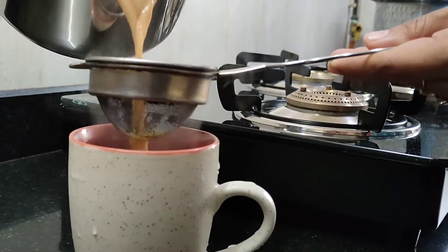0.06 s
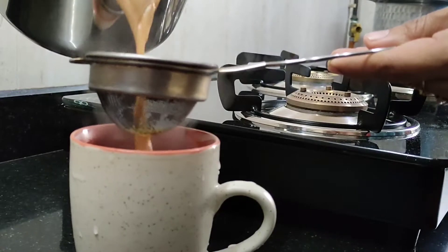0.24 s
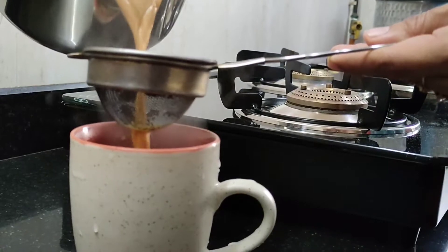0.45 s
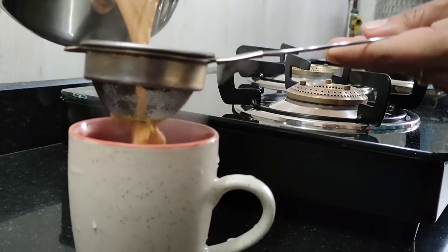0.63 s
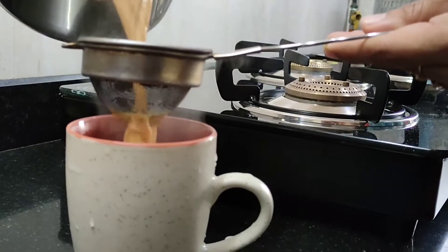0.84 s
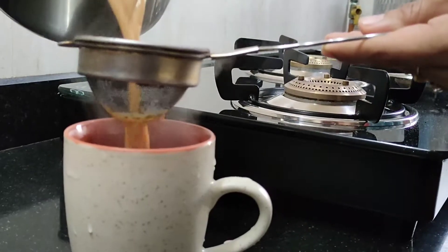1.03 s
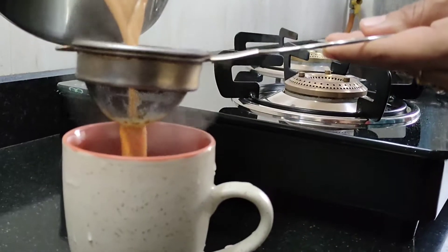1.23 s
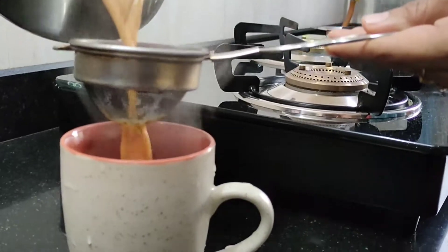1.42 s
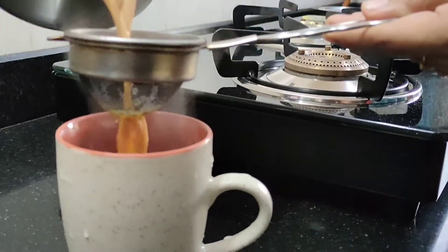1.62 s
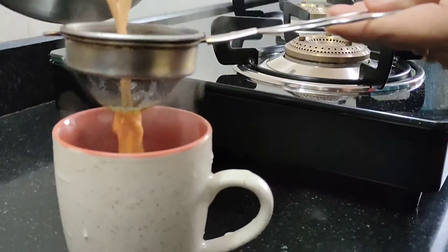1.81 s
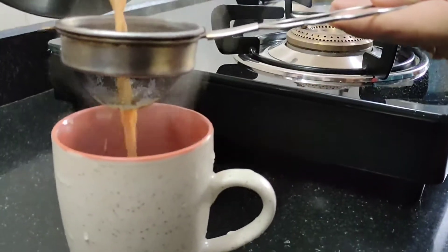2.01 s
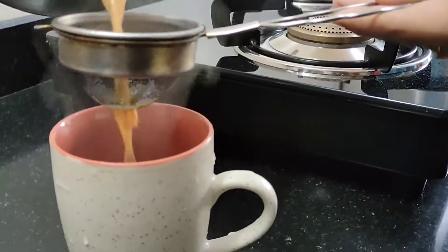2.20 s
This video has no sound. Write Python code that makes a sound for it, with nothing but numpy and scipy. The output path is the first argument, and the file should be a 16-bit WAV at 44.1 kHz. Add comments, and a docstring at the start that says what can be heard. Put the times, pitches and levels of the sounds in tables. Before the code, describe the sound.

Hot tea pours through a strainer into a ceramic mug, heard close up in a small kitchen. Bubbles plop and spray patters, then the stream thins and its note climbs, over a low rumble and faint appliance hum.

```python
"""Hot tea pours from a pan through a strainer into a ceramic mug, heard close up in a small kitchen.
The stream traps air bubbles that plop and make the air in the mug ring; spray snaps and patters
around them. As the mug fills, the flow thins, the bubbles get smaller and the note of the mug climbs.
Underneath, a low rumble swells and fades with the pour, and an appliance hums."""
import sys
import numpy as np
from scipy import signal
from scipy.fft import rfft, irfft
from scipy.io import wavfile
from scipy.ndimage import uniform_filter1d

SR = 44100
rng = np.random.default_rng(int(sys.argv[2]) if len(sys.argv) > 2 else 0)


def to_wav(s):
    """Save 16-bit WAV."""
    ch = np.atleast_2d(s).T  # columns
    pcm = np.round(np.clip(ch, -1, 1) * 32767)  # PCM
    wavfile.write(sys.argv[1], SR, pcm.astype(np.int16))


N = 103635

# colour of the low background rumble: frequency_hz, density_db
RUMBLE_COLOUR = [(15, 5), (40, 9.5), (160, 5.5), (260, 1.5), (600, -5.5), (1500, -37), (16000, -64)]
# low background rumble that swells with the pour and fades as it thins: time_s, level_db
RUMBLE_LEVEL = [(.2, -54), (1.15, -49), (2.2, -57)]
# partials of the appliance hum: pitch_hz, level_db
HUM_PARTIALS = [(120.2, -52), (227, -62.5)]
# reverb time of the kitchen: frequency_hz, t60_s
KITCHEN_DECAY = [(150, 0.4), (1000, 0.033), (5000, 0.051), (15000, 0.026)]
# two low notes of the air in the mug and the thin ring of the strainer: pitch_hz, t60_s, gain_db
MUG_MODES = [(570, 0.032, 10), (695, 0.019, 4), (8200, 0.024, -20)]
# rising note of the air column, around which the small bubbles sound: time_s, pitch_hz
COLUMN_NOTE = [(.3, 1095), (.7, 1310), (1.1, 1370), (1.5, 1535), (1.85, 1840)]
# colour of the spray: frequency_hz, gain_db
SPRAY_COLOUR = [(300, -40), (1200, 1), (2800, -3.5), (4700, -1), (6500, -12), (7900, 0.5), (9500, -0.5),
                (11000, -5), (12300, -1), (16000, -13)]
# loud drops of spray bursting: start_s, level_db, centre_hz
SPRAY_DROPS = [(0.241, -22.5, 12100), (0.2995, -15, 9360), (0.3683, -22, 5530), (0.4672, -16.5, 9160),
               (0.501, -22, 4450), (0.54, -29, 3470), (0.5671, -19.5, 8860), (0.5992, -14.5, 9370),
               (0.6063, -18, 7660), (0.7059, -21, 9800), (0.73, -23.5, 4170), (0.817, -21.5, 8500),
               (0.859, -21, 8600), (0.8842, -20.5, 9030), (0.909, -19.5, 7700), (0.919, -22, 4300),
               (0.943, -22.5, 8200), (0.9783, -28, 8200), (1.009, -20, 6330), (1.012, -16.5, 8320),
               (1.039, -24.5, 14700), (1.0687, -23, 3580), (1.076, -10.5, 10570), (1.1064, -23.5, 3860),
               (1.1106, -23.5, 8500), (1.131, -26.5, 7200), (1.154, -20, 8260), (1.158, -18.5, 13500),
               (1.181, -23, 4320), (1.235, -20.5, 6800), (1.3383, -30, 3920), (1.391, -28.5, 8060),
               (1.4406, -18.5, 4520), (1.4856, -14.5, 11700), (1.5325, -16.5, 7200), (1.5946, -20.5, 7060),
               (1.5989, -16, 9300), (1.664, -22, 8840), (1.6704, -22.5, 8900), (1.827, -28.5, 4800),
               (1.988, -31.5, 11800), (2.0215, -25.5, 7800), (2.0447, -29, 7460), (2.1382, -21, 12600),
               (2.292, -32, 3780)]
# strength of the stream: time_s, burble_db, patter_db
STREAM_FLOW = [(.14, -39.5, -42), (.21, -42.5, -35.5), (.29, -49, -46), (.42, -35, -39.5),
               (.58, -37.5, -38.5), (.72, -40, -43), (.9, -36.5, -41), (.98, -43, -45.5),
               (1.17, -42, -41.5), (1.36, -49.5, -55), (1.5, -47.5, -40.5), (1.72, -48.5, -47.5),
               (1.86, -42, -39.5), (2.0, -53, -52), (2.08, -49, -49.5), (2.18, -53, -53), (2.35, -59, -52)]
# single bubbles trapped by the stream: start_s, level_db, pitch_hz, decay_cycles
TRAPPED_BUBBLES = [(0.207, -14.5, 1260, 0.77), (0.24, -6.5, 1134, 4.5), (0.2518, -29, 1200, 5.6),
                   (0.2984, -5.5, 970, 2.3), (0.3466, -17, 1120, 3.3), (0.353, -22.5, 1210, 1.8),
                   (0.3679, -4, 4740, 5.1), (0.368, -7.5, 1510, 0.75), (0.38, -5, 938, 2.2),
                   (0.393, -9, 1090, 0.88), (0.3971, -7.5, 1090, 0.92), (0.4103, -32, 1140, 3.2),
                   (0.4323, -13.5, 850, 3.9), (0.4511, -17, 1280, 1), (0.4668, -13, 1200, 0.99),
                   (0.476, -5, 990, 0.77), (0.514, -17.5, 1900, 1.9), (0.5368, -11.5, 1370, 2),
                   (0.5407, -0.5, 920, 0.77), (0.5653, -7.5, 1250, 0.64), (0.5859, -12.5, 850, 1),
                   (0.5936, -5.5, 5200, 1.2), (0.6, -4, 2300, 0.26), (0.6299, -5, 1130, 0.88),
                   (0.6663, -9, 950, 0.68), (0.7166, -15.5, 1370, 0.93), (0.7423, -4.5, 1320, 1.4),
                   (0.8124, -14.5, 1370, 1.24), (0.8753, -20.5, 1237, 9), (0.9028, -20, 1380, 1.6),
                   (0.91, -26, 463, 0.79), (0.937, -15, 1255, 1.6), (1.0023, -16.5, 1390, 4),
                   (1.069, -11, 1970, 2.9), (1.0734, -6, 1290, 0.8), (1.076, -27, 570, 1.03),
                   (1.111, -10.5, 1380, 0.42), (1.1475, -17.5, 1280, 1.6), (1.1542, -6.5, 1140, 0.51),
                   (1.181, -16, 1350, 1.4), (1.187, -20.5, 540, 0.27), (1.2355, -13, 1820, 0.81),
                   (1.2565, -19.5, 1350, 2.5), (1.2658, -7.5, 1270, 0.82), (1.266, -17, 388, 0.31),
                   (1.2873, -24, 1700, 1), (1.294, -13.5, 1700, 1.5), (1.2999, -20, 1640, 1.2),
                   (1.325, -29, 3080, 3.7), (1.35, -19.5, 1690, 0.78), (1.3912, -12, 1490, 0.4),
                   (1.406, -10, 1180, 0.36), (1.4409, -5, 1584, 1.8), (1.4532, -14.5, 2300, 0.69),
                   (1.4565, -11.5, 1670, 0.6), (1.488, -11, 3670, 1.3), (1.5065, -10.5, 2210, 1.3),
                   (1.532, -6.5, 2320, 0.41), (1.5502, -21, 1930, 1.4), (1.586, -14.5, 1770, 1.1),
                   (1.601, -11.5, 1720, 0.6), (1.6118, -10, 1140, 1.4), (1.625, -17, 1680, 1.1),
                   (1.666, -6, 1800, 1.15), (1.7038, -8, 1200, 0.32), (1.7379, -24, 1610, 6.1),
                   (1.7556, -11.5, 1870, 2.1), (1.8117, -27.5, 4010, 16), (1.8223, -17, 1740, 0.47),
                   (1.8385, -21, 1640, 2.4), (1.8641, -14, 2100, 3.2), (1.8995, -26.5, 1850, 1.6),
                   (1.9045, -17.5, 1720, 1.06), (1.9135, -24, 1120, 0.27), (1.9251, -26, 2000, 1.4),
                   (1.944, -19, 1470, 1.7), (1.9744, -23, 2550, 1.8), (2.022, -17, 2200, 0.71),
                   (2.043, -25.5, 2390, 2.5), (2.0541, -21.5, 1450, 2.9), (2.0666, -15.5, 1430, 0.33),
                   (2.0828, -17, 1540, 0.41), (2.113, -19.5, 2740, 0.6), (2.2273, -19.5, 1510, 1.2),
                   (2.254, -20, 2260, 0.98), (2.3, -17, 2180, 0.23), (2.346, -20.5, 2270, 0.47)]

PLOP_DB, SNAP_DB, SPLASH_DB, REVERB_DB = -3.5, -2, -20, -30  # mix trims
PLOP_WIDTH, SNAP_WIDTH, PATTER_WIDTH, RUMBLE_WIDTH = 0.02, 0.34, 0.12, 0.14  # stereo side over mid


def amp(db):
    """Decibels to gain."""
    return 10 ** (np.asarray(db) / 20)


def unit(x):
    """Scales to rms 1."""
    return x / np.sqrt(np.mean(x ** 2) + 1e-20)


def stereo(mid, side):
    """Mid and side to left and right."""
    return np.array([mid + side, mid - side])


def by_hz(points, hz):
    """Reads a table on a log-frequency axis."""
    f, value = np.transpose(points)
    return np.interp(np.log(hz + 1), np.log(f), value)


def by_time(points, column=1):
    """One column of a time table, at every sample."""
    rows = np.array(points)
    return np.interp(np.arange(N) / SR, rows[:, 0], rows[:, column])


def add(mix, start_s, sound):
    """Mixes a sound in at its start time."""
    part = mix[..., max(round(start_s * SR), 0):][..., :sound.shape[-1]]
    part += sound[..., :part.shape[-1]]


def arrivals(clumps, per_s, spread_db):
    """Random impacts of uneven size, louder and softer in clumps."""
    hits = rng.random(N) < per_s / SR
    return hits * amp(spread_db * np.minimum(rng.exponential(1, N), 3.5)) * clumps


def resonate(x, hz, width_hz):
    """A resonance of gain 1 at a fixed or moving pitch."""
    carrier = np.exp(2j * np.pi * np.cumsum(hz * np.ones(N)) / SR)
    pole = np.exp(-np.pi * width_hz / SR)
    return 2 * (carrier * signal.lfilter([1 - pole], [1, -pole], x / carrier + 1e-18)).real


def low_rumble():
    """A bed of low noise that swells with the pour and fades as it thins."""
    colour = amp(by_hz(RUMBLE_COLOUR, np.fft.rfftfreq(N, 1 / SR)))
    mid, side = irfft(rfft(rng.standard_normal((2, N))) * colour, N)
    return amp(by_time(RUMBLE_LEVEL)) * unit(stereo(mid, RUMBLE_WIDTH * side))


def appliance_hum():
    """An appliance drones on steady low tones, dead centre."""
    t = np.arange(N) / SR
    return sum(amp(db) * np.sqrt(2) * np.sin(2 * np.pi * (hz * t + rng.random()))
               for hz, db in HUM_PARTIALS)


def kitchen_reverb(x, size=20000, build_s=0.008):
    """The walls return a short diffuse tail, centred in the bass and wide in the treble."""
    hz, t, spectra = signal.stft(rng.standard_normal((2, size)), SR, nperseg=256)
    spectra = spectra * amp(-60 * t / by_hz(KITCHEN_DECAY, hz)[:, None])
    spectra[1] *= np.minimum(hz / 6000, 1)[:, None]  # the side opens up with frequency
    _, tails = signal.istft(spectra, SR, nperseg=256)
    mid, side = tails * np.minimum(np.arange(tails.shape[1]) / SR / build_s, 1)
    return signal.fftconvolve(x, stereo(mid, side) / np.linalg.norm(mid), axes=1)[:, :N]


def mug_echoes(sound, count=5, delay_s=0.0011, level_db=-7):
    """A few quick echoes off the inside of the mug, different for every place on the surface."""
    out = sound.copy()
    for late, strength in zip(rng.exponential(1, count), rng.standard_normal(count)):
        add(out, delay_s * (0.4 + late), amp(level_db) * strength / np.sqrt(count) * sound)
    return out


def mug_ring(x, column_db=-2.5, scoop_hz=850, low_cut_hz=250):
    """Mug and strainer ring briefly after every hit; the note of the air column climbs with the fill."""
    rung = x + sum(amp(db) * resonate(x, hz, np.log(1000) / np.pi / t60) for hz, t60, db in MUG_MODES)
    rung += amp(column_db) * resonate(x, by_time(COLUMN_NOTE), width_hz=190)
    # the mug swallows the band just above its low notes and radiates little below them
    notched = signal.lfilter(*signal.iirnotch(scoop_hz, Q=2.33, fs=SR), rung)
    low_cut = signal.butter(1, low_cut_hz, "high", fs=SR, output="sos")
    return signal.sosfilt(low_cut, (rung + notched) / 2)


def snap(hz, width, size=512, attack_s=0.00025, crack_s=0.00011, fizz_s=0.0015, fizz_db=-7.5):
    """A drop bursts: a crack with a short fizz, different at each ear, and the ping of a tiny bubble."""
    t, f = np.arange(size) / SR, np.fft.rfftfreq(size, 1 / SR)
    focus = np.exp(-0.5 * np.log2((f + 1) / hz) ** 2)  # a bell, one octave to each side
    colour = amp(by_hz(SPRAY_COLOUR, f)) * (0.061 + focus)
    attack = 1 - np.exp(-t / attack_s)
    envelope = attack * (np.exp(-t / crack_s) + amp(fizz_db) * np.exp(-t / fizz_s))
    phases = np.exp(2j * np.pi * rng.random((2, len(f))))
    crack, side = irfft(phases * colour, size) * envelope
    ping = unit(attack * bubble(hz, decay_cycles=4, size=size))
    mid = unit(unit(crack) + ping)
    return stereo(mid, width * unit(side)) * np.sqrt(0.0015 * SR / size)  # energy of 1.5 ms at rms 1


def patter(clumps, voices=36):
    """Fine spray and foam tick on the tea, the mesh and the wall of the mug."""
    hits = arrivals(clumps, per_s=680, spread_db=4)
    voice = rng.integers(0, voices, N)
    out = np.zeros((2, N))
    for k, hz in enumerate(np.geomspace(2400, 14500, voices)):
        tick = amp(by_hz(SPRAY_COLOUR, hz)) * snap(hz, PATTER_WIDTH)
        out += signal.oaconvolve((hits * (voice == k))[None], tick, axes=1)[:, :N]
    return unit(out) * amp(by_time(STREAM_FLOW, column=2))


def spray_snaps():
    """The loud drops of spray burst as bright accents over the patter."""
    out = np.zeros((2, N))
    for start_s, db, hz in SPRAY_DROPS:
        add(out, start_s, amp(db + SNAP_DB) * snap(hz, SNAP_WIDTH))
    return out


def bubble(hz, decay_cycles, size=1300, pinch_s=0.00026, wobble_depth=0.066, wobble_cycles=3.3):
    """A pocket of air pinches off and rings briefly, its pitch wavering as it deforms."""
    t = np.arange(size) / SR
    wobble = wobble_depth * np.sin(2 * np.pi * (hz * t / wobble_cycles + rng.random()))
    cycles = np.cumsum(hz * (1 + wobble)) / SR
    envelope = (1 - np.exp(-t / pinch_s)) ** 2 * np.exp(-cycles / decay_cycles)
    return -envelope / envelope.max() * np.sin(2 * np.pi * cycles)


def burble(clumps, spread_octaves=0.4):
    """Many small bubbles ring under the stream, scattered around the note of the air column."""
    hits = arrivals(clumps, per_s=380, spread_db=3)
    pitch_hz = by_time(COLUMN_NOTE) * 2 ** (spread_octaves * rng.standard_normal(N))
    decay_cycles = 1.63 * rng.uniform(1, 2.43, N)
    out = np.zeros(N)
    for i in np.flatnonzero(hits):
        add(out, i / SR, hits[i] * bubble(pitch_hz[i], decay_cycles[i]))
    return unit(out) * amp(by_time(STREAM_FLOW, column=1))


def plops():
    """The up-front bubbles, damped by the foam; each starts with the small splash that traps it."""
    out = np.zeros((2, N))
    for start_s, db, hz, decay_cycles in TRAPPED_BUBBLES:
        pan = PLOP_WIDTH * rng.standard_normal()
        plop = mug_echoes(bubble(hz, decay_cycles))
        splash = snap(rng.uniform(2370, 6480), SNAP_WIDTH)
        add(out, start_s, amp(db + PLOP_DB) * np.outer([1 + pan, 1 - pan], plop))
        add(out, start_s, amp(db + SPLASH_DB) * splash)
    return out


def scene(clump_s=0.003, clump_db=5):
    """The pour rings through the mug, with a touch of kitchen reverb, over rumble and hum."""
    surge = unit(uniform_filter1d(rng.standard_normal(N), round(clump_s * SR)))
    clumps = amp(clump_db * np.minimum(surge, 1))  # patter and burble flutter together
    tea = mug_ring(plops() + spray_snaps() + patter(clumps) + burble(clumps))
    return tea + amp(REVERB_DB) * kitchen_reverb(tea) + low_rumble() + appliance_hum()


def record(dry, start_s=0.1364, fade_s=0.00031, high_cut_hz=16300):
    """The sound cuts in after a moment of silence, with the very top end filtered off."""
    gate = np.clip((np.arange(N) / SR - start_s) / fade_s, 0, 1)
    high_cut = signal.firwin(255, high_cut_hz, window=("kaiser", 9), fs=SR)
    return signal.oaconvolve(dry * gate, high_cut[None], "same")


dry = scene()
out = record(dry)
to_wav(out)
```